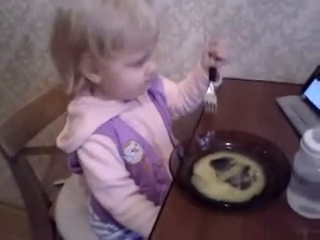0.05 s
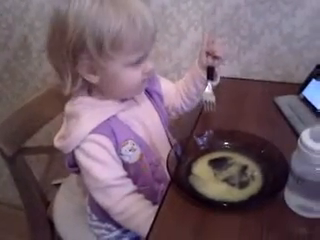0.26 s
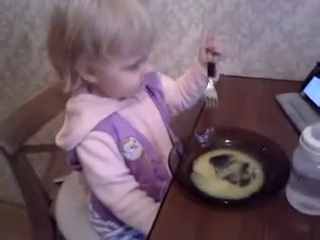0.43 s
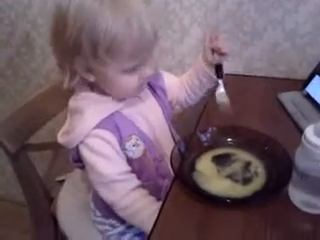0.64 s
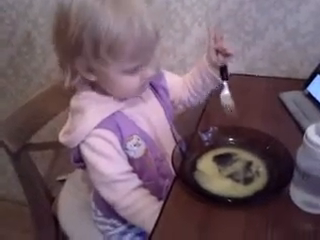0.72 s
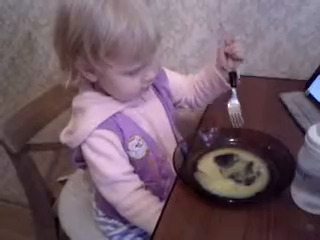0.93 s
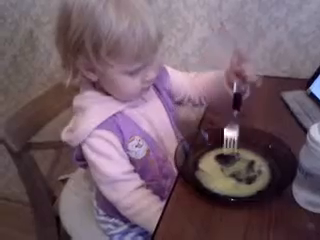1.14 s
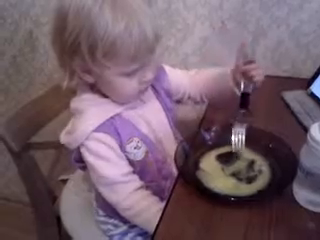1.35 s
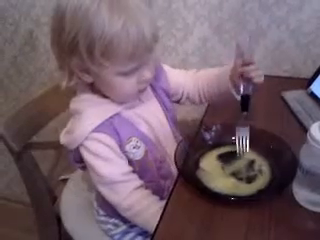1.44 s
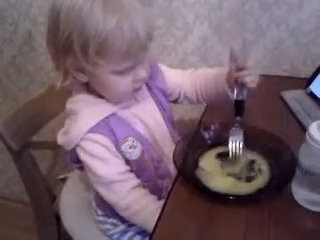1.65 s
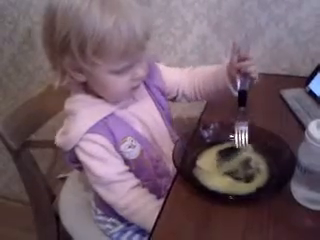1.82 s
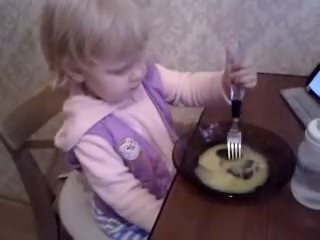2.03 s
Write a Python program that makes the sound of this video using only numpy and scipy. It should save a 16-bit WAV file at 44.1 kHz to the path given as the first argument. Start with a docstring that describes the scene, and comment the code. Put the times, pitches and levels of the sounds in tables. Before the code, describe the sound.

A metal fork clinks twice on a glass plate, then its tines scrape with tiny squeaks

```python
"""In a small room, a metal fork is jabbed twice into a glass plate on a wooden table.
Each jab is an impact: a noise crack and decaying sine modes give a short bright clink, and a low glass note
swells behind it. The push sets the table booming in low modes and diffuse noise. The tines then skid and drag
in wavering sine squeaks with noise grit. Coloured noise and faint drones form the quiet room noise, a small
high tick comes before the jabs, and the microphone has a dull top."""
import sys
import numpy as np
from scipy import signal
from scipy.fft import rfft, irfft
from scipy.io import wavfile

SR = 44100
rng = np.random.default_rng(int(sys.argv[2]) if len(sys.argv) > 2 else 0)


def master_out(mix):
    """Clip the mix to full scale and print it as 16-bit PCM to the path in sys.argv[1]."""
    frames = np.transpose(np.atleast_2d(mix))
    ceiling = np.clip(frames, -1, 1)
    pcm = np.round(ceiling * 32767).astype(np.int16)
    wavfile.write(sys.argv[1], SR, pcm)


N = 91683
TIME = np.arange(N) / SR  # t/s

# Quiet room noise, spectral density: [f/Hz, level/dB per Hz]
AIR_SPECTRUM = [(10, -2), (25, -0.5), (36, -3.5), (60, -4), (110, -8.5), (260, -10), (500, -14), (950, -13),
                (1500, -18.5), (2400, -24.5), (6400, -29), (7400, -33.5), (8000, -80.5)]
AIR_DB = -49
# Faint drones in the room noise: [f/Hz, width/Hz, level/dB]
DRONES = [(130, 14, -62), (197.9, 7.4, -64.5), (809, 27, -62.5)]
# Faint tick before the jabs: [t/s, level/dB, t60/s, f/Hz, width/Hz]
TICK = (.553, -60, .14, 6100, 1300)

# Jabs of the fork: [t/s, clink level/dB, ring length factor, clink tilt/dB per octave, room level/dB,
#   glass note level/dB, table level/dB, table swell/s, table tilt/dB per octave]
JABS = [(1.4096, -6, 0.6, -2.5, -9, -25.5, -38, 0.019, -2),
        (1.6802, -18, 0.74, -2, -19, -36.5, -41, 0.035, -1)]
CONTACT_RISE_S, CONTACT_HOLD_S = 0.0013, 0.0058
# Crack of steel on glass, spectral density: [f/Hz, level/dB per Hz]
CRACK_SPECTRUM = [(200, 2), (800, -1.5), (1300, -11), (2000, -8), (3100, -3.5), (4500, -16), (5500, 2),
                  (7300, -7.5), (9000, -17.5)]
CRACK_DB, CRACK_T60_S, CRACK_ROOM_DB = -16.5, 0.018, 0
# Modes of plate and fork together, before each jab's tilt and ring length factor:
#   [f/Hz, level/dB, t60/s, room send/dB]
PLATE_FORK_MODES = [(2520, -21.5, 0.051, 3), (3580, -38, .03, 7.5), (4011, -18.5, .05, 5.5),
                    (4047, -2, .05, -11), (3930, -18, .04, 1), (4250, -20.5, .045, 7.5),
                    (4308, -10.5, 0.04, -22.5), (4350, -17.5, .045, -8), (4686, -22.5, 0.093, 0.5),
                    (4790, -25, 0.022, 7.5), (5050, -26.5, 0.017, 6.5), (6030, -24, 0.023, 5.5),
                    (6217, -8.5, 0.15, -10.5), (6289, -10, 0.04, -5), (7050, -27, 0.0078, 3)]
# Low glass note: its bloom after a jab, and the faint ring it leaves
NOTE_HZ, NOTE_SWELL_S, NOTE_HOLD_S, NOTE_T60_S = 2546, 0.042, 0.016, 0.18
LINGER_HZ, LINGER_DB, LINGER_T60_S = 2487, -47, 1.47

# Modes of the wooden table top, before each jab's tilt: [f/Hz, level/dB, t60/s]
TABLE_MODES = [(132.6, -4, 0.56), (208, -15, .35), (269, -1, 0.72), (288, -3.5, 0.33), (332, -7, .4),
               (382.2, -2, 0.083), (525.5, -10, 0.31), (668, -1, 0.3)]
# Table boom spread through the room, spectral density before tilt: [f/Hz, level/dB per Hz]
BOOM_SPECTRUM = [(40, -30), (130, -6.5), (280, 2.5), (550, -5), (900, -5), (1200, -17), (2200, -36.5)]
BOOM_DB, BOOM_HOLD_S, BOOM_T60_S = -1, 0.017, 0.47

# Skids and drags of the tines: [t/s, length/s, squeak f/Hz, squeak level/dB, grit level/dB]
DRAGS = [(1.471, 0.025, 3994, -24.5, -50.5), (1.688, .008, 4063, -17.5, -43),
         (1.711, .024, 3960, -26, -49.5), (1.748, 0.012, 4690, -35.5, -56.5),
         (1.810, .100, 2505, -43.5, -63), (1.8287, 0.013, 4030, -29, -42.5),
         (1.84, 0.0086, 4060, -33.5, -41), (1.846, .020, 3990, -34.5, -48), (1.886, 0.02, 4005, -25, -45),
         (1.906, .018, 4010, -42, -55), (1.914, 0.064, 2570, -39, -48.5), (2.006, .008, 4080, -39, -42),
         (2.007, 0.018, 4060, -31.5, -40), (2.05, 0.016, 4620, -36.5, -48),
         (2.054, 0.023, 4015, -25.5, -45.5), (2.072, 0.01, 4020, -27.5, -53)]
# Rubbing of steel on glass, spectral density: [f/Hz, level/dB per Hz]
FRICTION_SPECTRUM = [(300, -20.5), (1800, -14.5), (3200, -6.5), (4000, -4), (4800, -6), (5500, -1.5),
                     (7300, -3.5), (9000, -16)]
SQUEAK_WAVER_HZ = 25  # rms deviation of the squeak frequency
DRAG_ROOM_DB, GRIT_RING_DB = -6, 7.5

ROOM_T60_S, ROOM_GAP_S, ROOM_BUILD_S, ROOM_HOLD_S = 0.32, 0.0043, 0.0017, 0.0083
DULL_ABOVE_HZ, CUTOFF_HZ, TOP_LEAK_DB = 7550, 8950, -10.5


def from_db(db):
    """Level: an amplitude ratio is ten to the power of decibels over twenty."""
    return 10 ** (np.asarray(db) / 20)


def rms_one(x):
    """Normalisation: division by the root mean square gives unit rms."""
    return x / np.sqrt(np.mean(x ** 2) + 1e-20)


def noise(spectrum):
    """Spectral shaping: white noise weighted by levels interpolated over log frequency; unit rms."""
    hz, db = np.transpose(spectrum)
    bins_hz = np.maximum(np.fft.rfftfreq(N, 1 / SR), 1)
    gain = from_db(np.interp(np.log(bins_hz), np.log(hz), db))
    white = rng.standard_normal(N)
    return rms_one(irfft(rfft(white) * gain, N))


def resonate(x, hz, width):
    """Resonance: a conjugate pole pair passes a band of the given width, with gain near 1 at its peak."""
    radius = np.exp(-np.pi * abs(width) / SR)
    zeros = np.array([1, 0, -1]) * (1 - radius ** 2) / 2
    poles = [1, -2 * radius * np.cos(2 * np.pi * hz / SR), radius ** 2]
    return signal.lfilter(zeros, poles, x)


def envelope(start, rise, hold, t60):
    """Exponential decay: after a straight rise and a hold, the amplitude falls 60 dB in t60."""
    age = TIME - start
    decay_age = np.maximum(age - rise - hold, 0)
    return np.clip(age / rise, 0, 1) * np.exp(-np.log(1000) * decay_age / t60)


def sine(hz, start):
    """Simple harmonic motion: a mode whose phase is zero at the given moment."""
    return np.sin(2 * np.pi * hz * (TIME - start))


def room(x):
    """Reverberation: convolution with dense decaying reflections, set to the rms of the sound itself."""
    echoes = rng.standard_normal(N) * envelope(ROOM_GAP_S, ROOM_BUILD_S, ROOM_HOLD_S, ROOM_T60_S)
    return rms_one(signal.fftconvolve(x, echoes)[:N]) * np.std(x)


def background():
    """Stationary noise: a steady coloured spectrum with narrow bands heard as faint drones."""
    out = from_db(AIR_DB) * noise(AIR_SPECTRUM)
    for hz, width, db in DRONES:
        out += from_db(db) * rms_one(resonate(rng.standard_normal(N), hz, width))
    return out


def tick():
    """Band-limited transient: noise through two equal resonances rises quickly and decays."""
    start, db, t60, hz, width = TICK
    once = resonate(rng.standard_normal(N), hz, width)
    band = resonate(once, hz, width)
    return from_db(db) * rms_one(band) * envelope(start, CONTACT_RISE_S, 0, t60)


def clink(start, db, length, tilt_db, room_db):
    """Impact excitation: a crack, then modes that the pressed fork soon damps; the room carries them on."""
    direct = from_db(CRACK_DB) * noise(CRACK_SPECTRUM) * envelope(start, CONTACT_RISE_S, 0, CRACK_T60_S)
    tail = from_db(CRACK_ROOM_DB) * room(direct)
    middle_hz = np.median([mode[0] for mode in PLATE_FORK_MODES])  # pivot of the tilt
    for hz, mode_db, t60, send_db in PLATE_FORK_MODES:
        gain = from_db(mode_db + tilt_db * np.log2(hz / middle_hz))
        decay = envelope(start, CONTACT_RISE_S, CONTACT_HOLD_S, t60 * length)
        ring = gain * sine(hz, start) * decay
        direct = direct + ring
        tail = tail + from_db(send_db) * room(ring)
    return from_db(db) * direct + from_db(room_db) * tail


def glass_note(start, db):
    """Modal decay: a low plate note blooms just after a jab, drops, and leaves a thin ring behind."""
    bloom = from_db(db) * sine(NOTE_HZ, start) * envelope(start, NOTE_SWELL_S, NOTE_HOLD_S, NOTE_T60_S)
    linger = sine(LINGER_HZ, 0) * envelope(start, NOTE_SWELL_S, 0, LINGER_T60_S)
    return bloom + from_db(LINGER_DB) * linger


def table(start, db, swell, tilt_db):
    """Structure-borne sound: the push passes through the plate into wood, as low modes and a diffuse boom."""
    middle_hz = np.median([mode[0] for mode in TABLE_MODES])  # pivot of the tilt
    modes = np.zeros(N)
    for hz, mode_db, t60 in TABLE_MODES:
        gain = from_db(mode_db + tilt_db * np.log2(hz / middle_hz))
        modes += gain * sine(hz, start) * envelope(start, swell, CONTACT_HOLD_S, t60)
    colour = [(hz, band_db + tilt_db * np.log2(hz / middle_hz)) for hz, band_db in BOOM_SPECTRUM]
    boom = from_db(BOOM_DB) * noise(colour) * envelope(start, swell, BOOM_HOLD_S, BOOM_T60_S)
    return from_db(db) * (modes + boom)


def drags():
    """Stick-slip friction: one mode swells into a squeak, while fine grit excites all the modes."""
    friction = noise(FRICTION_SPECTRUM)
    rung = np.zeros(N)
    for hz, db, t60, send_db in PLATE_FORK_MODES:
        width = np.log(1000) / (np.pi * t60)  # bandwidth that belongs to this decay time
        rung += from_db(db + send_db) * resonate(friction, hz, width)
    grit = rms_one(friction + from_db(GRIT_RING_DB) * rms_one(rung))
    waver = SQUEAK_WAVER_HZ * rms_one(resonate(rng.standard_normal(N), 79, 100))  # centre, width in Hz
    out = np.zeros(N)
    for start, length, hz, squeak_db, grit_db in DRAGS:
        pressure = np.sin(np.pi * np.clip((TIME - start) / length, 0, 1))
        squeak = np.sin(2 * np.pi * np.cumsum(hz + waver) / SR)
        out += from_db(squeak_db) * pressure ** 2 * squeak
        out += from_db(grit_db) * pressure * grit
    return out + from_db(DRAG_ROOM_DB) * room(out)


def scene():
    """Superposition: room noise, tick, drags and the two jabs add linearly."""
    out = background() + tick() + drags()
    for start, db, length, tilt_db, room_db, note_db, table_db, swell, table_tilt_db in JABS:
        out = out + clink(start, db, length, tilt_db, room_db)
        out = out + glass_note(start, note_db)
        out = out + table(start, table_db, swell, table_tilt_db)
    return out[None, :]


def record(dry):
    """Low-pass filtering: the treble drops in a steep step; a little leaks past it, up to the cut-off."""
    dull_filter = signal.ellip(10, 0.2, 65, DULL_ABOVE_HZ, fs=SR, output="sos")
    leak_filter = signal.butter(8, DULL_ABOVE_HZ, "high", fs=SR, output="sos")
    cutoff_filter = signal.ellip(8, 0.2, 65, CUTOFF_HZ, fs=SR, output="sos")
    dull = signal.sosfilt(dull_filter, dry)
    leak = signal.sosfilt(leak_filter, dry)
    return signal.sosfilt(cutoff_filter, dull + from_db(TOP_LEAK_DB) * leak)


dry = scene()
out = record(dry)
master_out(out)
```